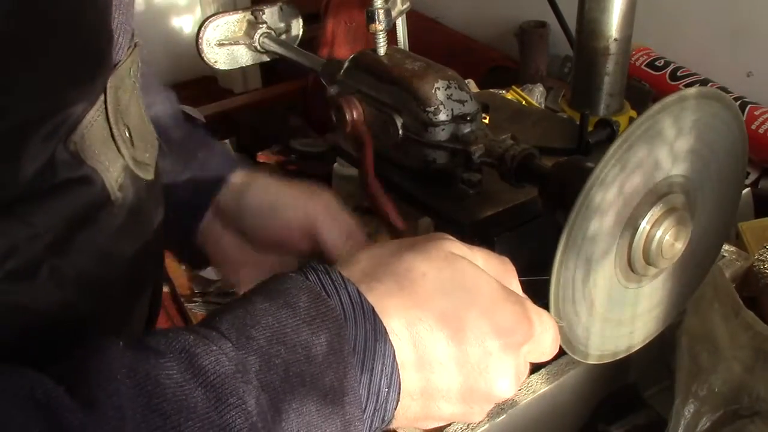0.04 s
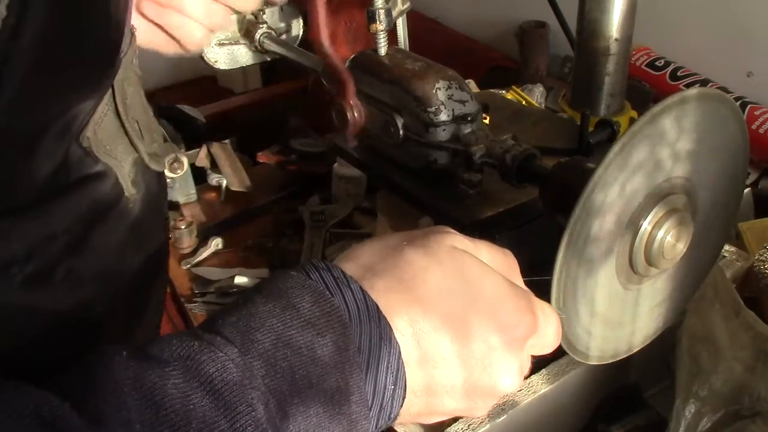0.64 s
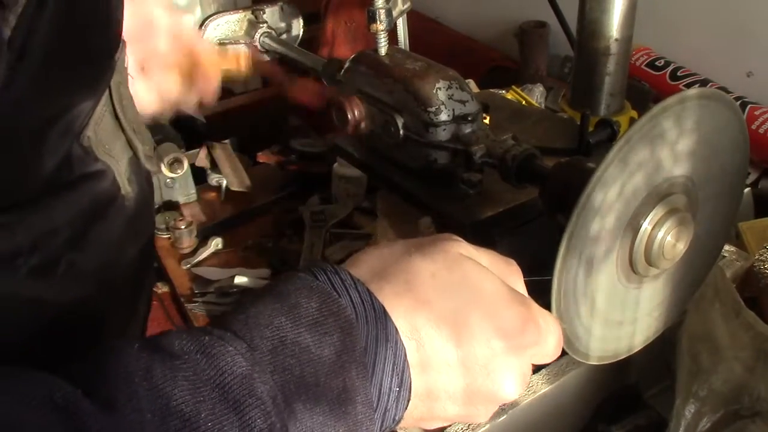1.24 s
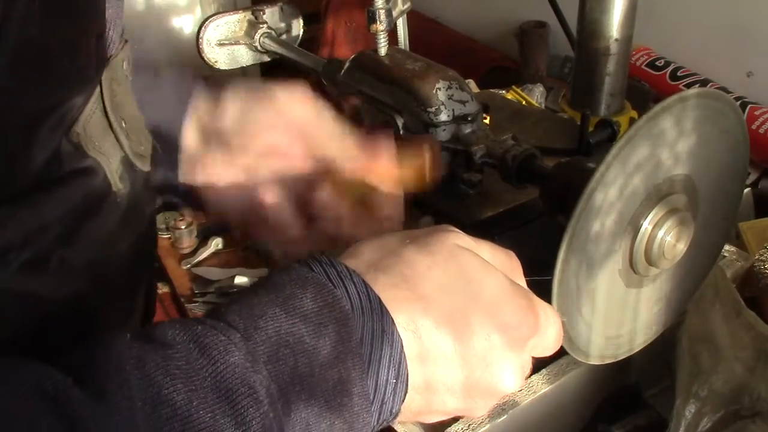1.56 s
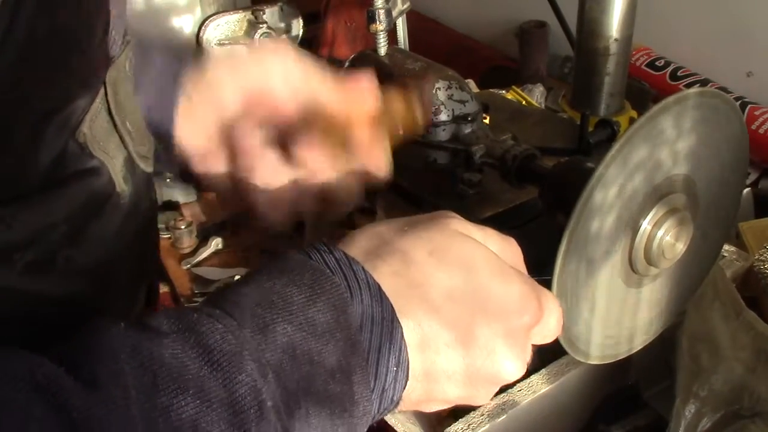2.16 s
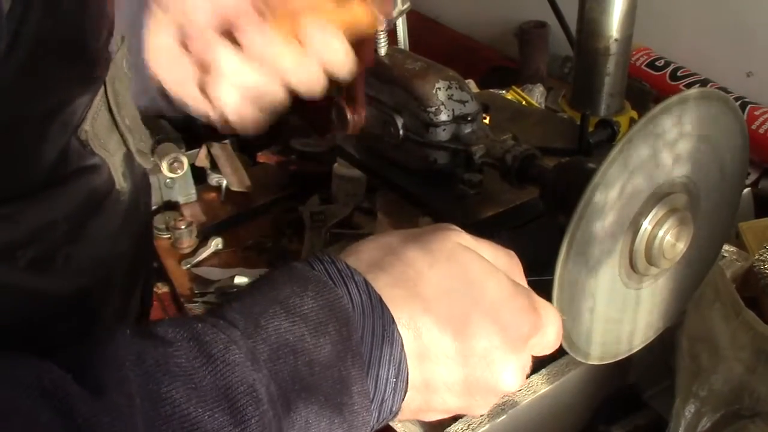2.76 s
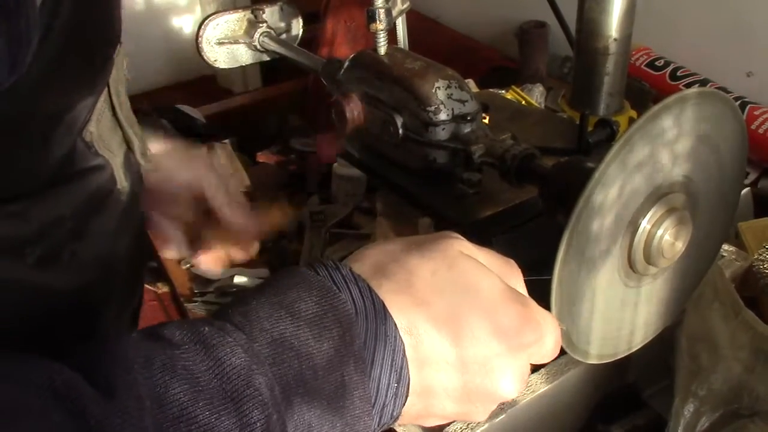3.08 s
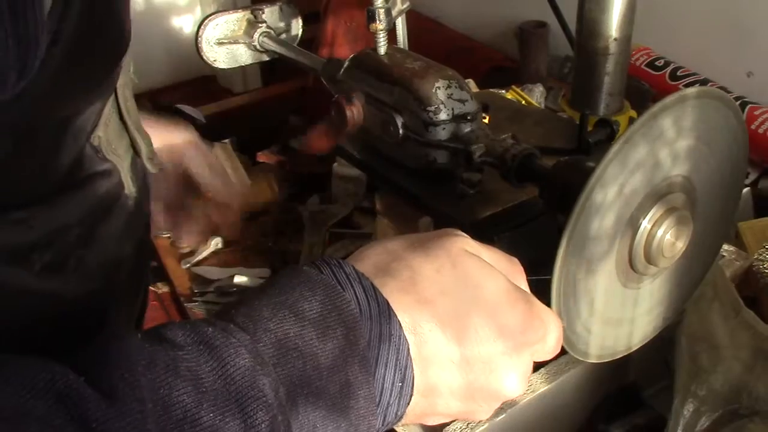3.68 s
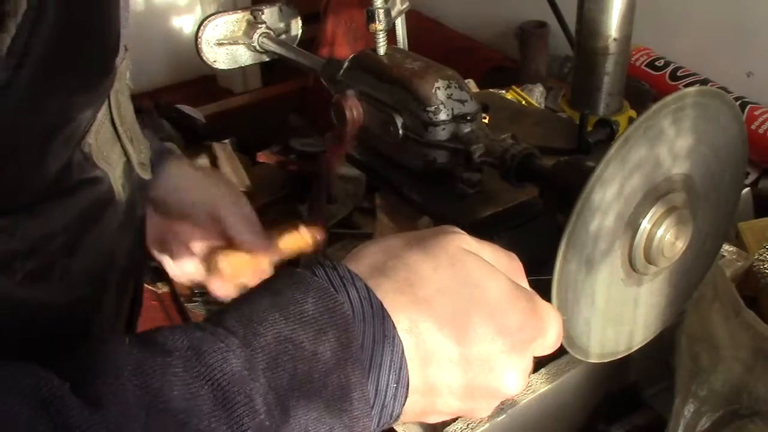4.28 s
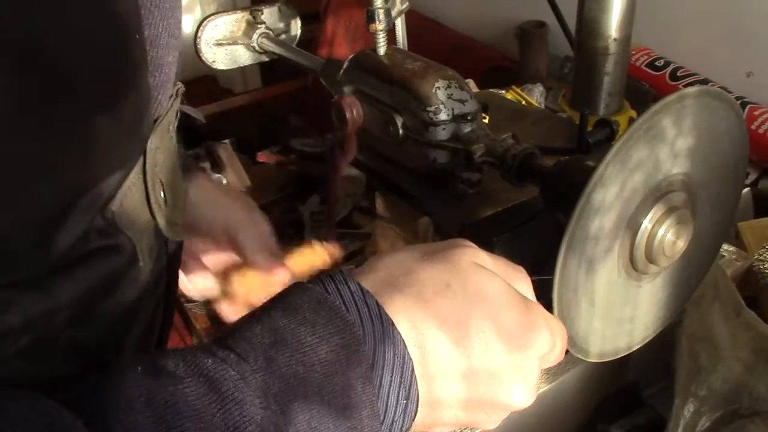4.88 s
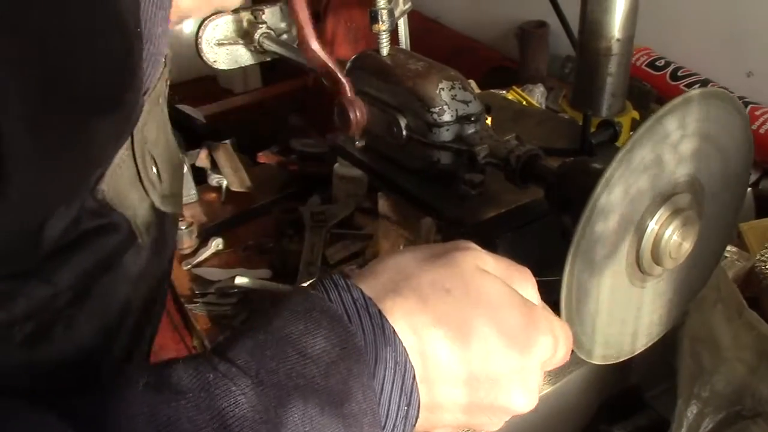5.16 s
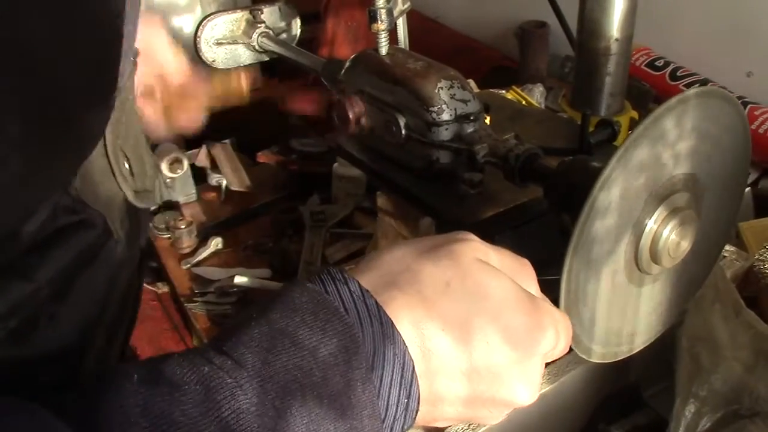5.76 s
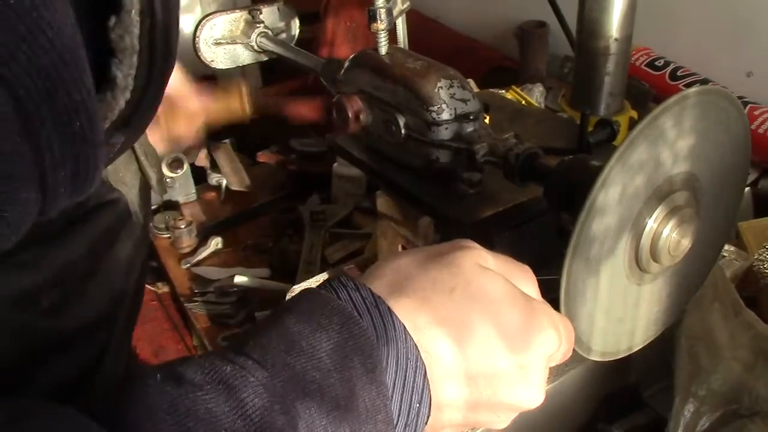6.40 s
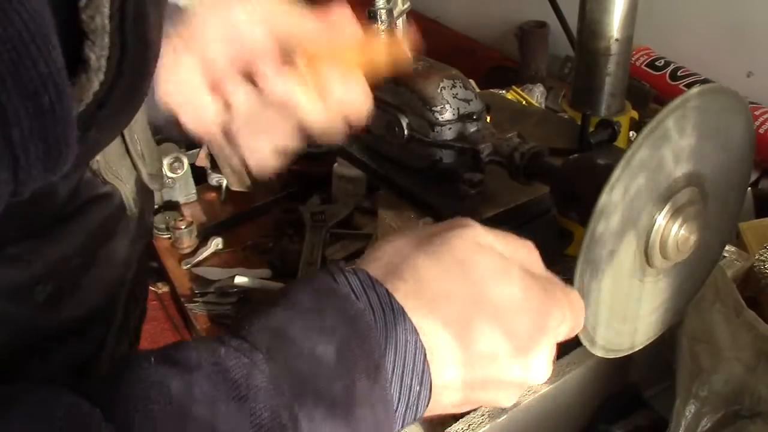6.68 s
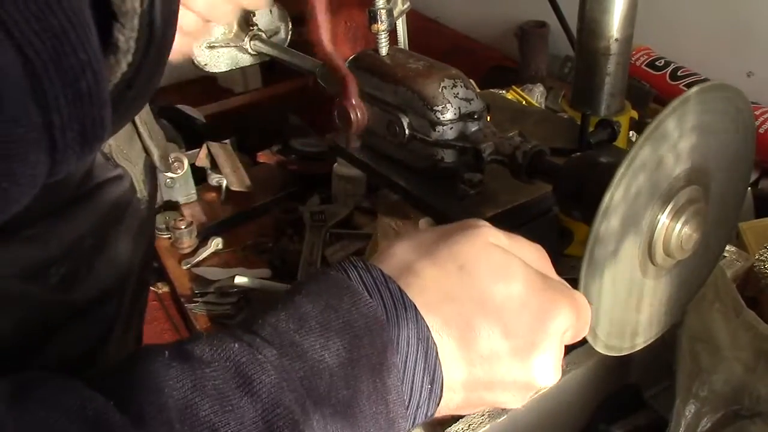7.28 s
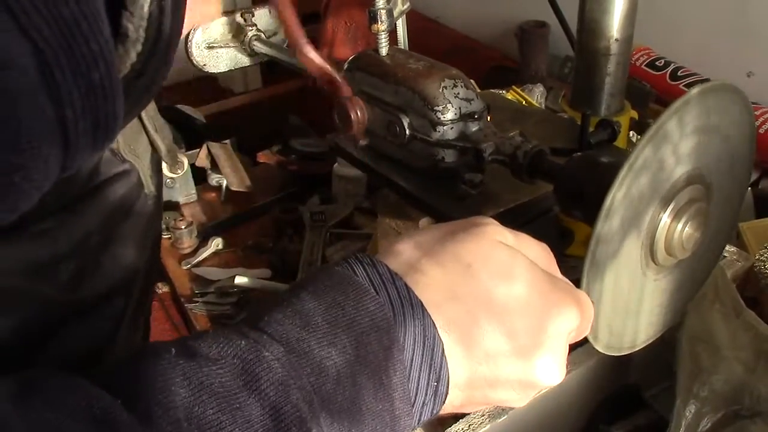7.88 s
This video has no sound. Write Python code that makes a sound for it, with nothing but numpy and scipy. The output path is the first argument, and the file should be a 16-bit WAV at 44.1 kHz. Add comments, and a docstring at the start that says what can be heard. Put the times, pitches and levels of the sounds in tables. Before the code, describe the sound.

Worn gears rattle and whir without pause as a hand-cranked grinder turns, close and centred before a stereo microphone at a workbench. Over them, a steel blade scrapes on the disc with a bright, ringing hiss that flutters with each turn and spits briefly when the edge catches. The pressure lightens midway and returns near the end, where the ring shifts in tone. The workshop adds very little echo.

```python
"""A steel blade on a hand-cranked grinding disc, at a workbench, close in front of a stereo microphone.
Grit scrapes the steel and makes it ring high, with a short burst whenever the edge catches. The disc
runs slightly out of true, so the grinding flutters with every turn. Under it, worn gear teeth rattle
the cast housing and the bench. Tools and walls nearby add a short tail."""
import sys
import numpy as np
from scipy import signal
from scipy.fft import rfft, irfft
from scipy.io import wavfile
from scipy.ndimage import uniform_filter1d, minimum_filter1d

SR = 44100
rng = np.random.default_rng(int(sys.argv[2]) if len(sys.argv) > 2 else 0)


def store_wav(level_fs):
    """Save 16-bit WAV to argv[1]."""
    pcm = np.round(np.clip(np.atleast_2d(level_fs), -1, 1) * 32767)
    wavfile.write(sys.argv[1], SR, pcm.T.astype(np.int16))


N = 350154
T = np.arange(N) / SR

# The handle passes the bottom of its circle. Each entry: time in seconds.
CRANK_TIMES = [-.68, .17, 1.0, 1.72, 2.35, 2.98, 3.61, 4.25, 4.9, 5.6, 6.26, 6.93, 7.6, 8.25]
# How hard the blade is pressed on, which also loads the gears. Each row: time in seconds, pressure in dB.
PRESSURE = [(0.0, 2.5), (0.73, 5), (1.23, 0), (1.92, 2.5), (3.44, -0.5), (3.48, 1.5), (3.99, -4.5),
            (4.47, 1.5), (4.6, -2.5), (4.98, -4), (5.49, -2.0), (5.61, -5.5), (5.82, -2.0), (6.0, -5),
            (6.12, -1), (6.3, -4.0), (6.69, 1), (7.32, -0.5), (7.38, 2), (7.94, 0.5)]
# The loaded gears clatter briefly. Each row: time of the peak in seconds, extra housing rattle in dB.
CLATTERS = [(.375, 1.5), (.74, 1.5), (3.08, 2.5), (3.51, 2.5), (4.55, 1), (5.13, 2.5), (5.34, 2), (5.84, 4),
            (6.93, 2.5), (7.57, 2)]
# How keenly the edge bites as the blade rocks. Each row: time in seconds, gain in dB.
EDGE_BITE = [(0.0, 2.0), (0.32, 5.0), (0.69, -1), (1.08, 6), (1.44, 0.5), (1.77, 4), (2.07, -5.5),
             (2.46, 3.5), (2.79, -1.5), (2.93, 4.5), (4.63, -2.5), (4.77, 1.5), (5.04, -1.5), (5.13, 2),
             (5.34, -7), (5.44, -0.5), (5.97, -2), (6.48, 2), (6.63, -7.5), (6.72, 2.5), (7.05, -6),
             (7.29, -5.5), (7.41, 0.5), (7.94, -7.5)]
# Where the blade touches sets the weight of its low ring. Each row: time in seconds, gain in dB.
TOUCH = [(0.0, 0.0), (2.75, -0.5), (3.15, 1.5), (3.27, -1.5), (3.57, 1), (3.98, -3.5), (5.01, 2.5),
         (5.75, -5.5), (6.16, -0.5), (7.94, 4)]
# The edge catches on coarse grit. Each row: start in seconds, relative level in dB.
CATCHES = [(.135, -15), (.167, -19), (1.258, -14), (2.391, -18), (2.601, -14), (2.745, -23), (2.858, -14),
           (3.539, -9), (3.623, -9.5), (5.116, -16), (5.232, -18), (6.705, -15)]

# Resonances. Each row: frequency in Hz, width in Hz, relative level in dB.
BENCH_MODES = [(191, 13, -11), (232, 9.4, -7), (277, 21.4, 0), (415, 16, -2.5), (478, 29, 4), (576, 28, 2),
               (683, 90, -1), (933, 48, -2), (1098.5, 46, 5.5), (1200, 21, 0), (1299, 24, 0),
               (1517, 21, 4.5), (1582, 29, 4.5)]  # bench and clamp
HOUSING_MODES = [(1756, 67, -11), (1883.4, 21.5, -0.5), (1937, 17.6, -1.5), (1995, 56, -9),
                 (2147.5, 39, 1.5), (2221, 38, -5), (2332, 37, -2), (2454, 65, -9.5), (2550, 79, -8.5),
                 (2638, 40, -3.5), (2675, 20, -7.5), (3257, 34, -9), (4572, 45, -7), (4690, 41, -6.5)]  # cast housing and gear wheels
SING_MODES = [(3456, 69, -1.5), (3528, 43, -2)]  # a singing band in the grinding
# Resonances of the steel, lowest first. Each row: frequency in Hz, width in Hz, relative level in dB,
# then frequency in Hz and relative level in dB after the fingers shift.
EDGE_MODES = [(7588, 190, 2.5, 7360, -7.5), (8100, 350, -6, 7870, -4), (9060, 260, -4, 8950, -9),
              (9470, 440, 1, 9550, 1.5), (10700, 220, -8, 10500, -2.5), (11030, 340, -5.5, 11150, -3),
              (11560, 230, -11.5, 11200, -5), (12450, 260, -16.5, 12500, -18),
              (12900, 200, -17, 12900, -12)]  # the edge's ring: the first two rows make its low ring, the rest its high ring
BENDING_MODES = [(473, 30, -4.5, 460, -22), (650, 60, -10, 662, -5), (884, 38, -13.5, 920, -2.5),
                 (4360, 120, -1, 4120, -19), (4677, 82, 0.5, 4700, 7.5), (6120, 200, -1, 5950, 4),
                 (6880, 150, -4, 6720, 2.5)]  # the whole blade flexing
# Smooth spectra, the beds that resonances stand on. Each row: frequency in Hz, relative level in dB.
BOOM_BED = [(20, -30), (60, -24), (105, -20), (160, -16), (205, -1.5), (290, 3), (380, -4), (470, -11),
            (1000, -37), (16000, -80)]  # low boom under the gears
BENCH_BED = [(20, -50), (60, -34), (110, -25.5), (165, -27), (220, -13.5), (320, -7), (760, -4.5),
             (1400, -11), (1750, -7.5), (2600, -24), (16000, -66)]  # dense small modes of the bench
HOUSING_BED = [(20, -70), (900, -41.5), (1600, -26), (1950, -14), (2550, -17.5), (2850, -23.5),
               (4400, -20.5), (5200, -36), (16000, -51)]
EDGE_BED = [(20, -80), (4000, -40), (7000, -41), (12000, -29.5), (16000, -36)]
SCRAPE_BED = [(20, -53), (1000, -16.5), (2900, -6), (4000, -3.5), (4800, -4.5), (5120, -8.5), (5500, -3),
              (6500, -1), (7100, -5.5), (8000, -4.5), (11200, -4), (13500, -15.5), (15600, -18)]  # the flat face on the disc
# Left and right differ slightly in level and phase across the treble.
# Each row: frequency in Hz, left minus right in dB, phase lead of the left in radians.
TREBLE_BALANCE = [(5300, -2, 0), (6060, -2.5, -0.46), (7200, 3, -0.14), (7940, -4.5, -.03),
                  (8600, 2, -0.05), (9540, -2.4, -0.1), (10200, 3.5, -0.078), (10950, -3, -0.35),
                  (11900, 0.5, 0.067)]

# How parts follow the pressure. Each law: base level in dB, dB per dB of pressure, fade in dB per second.
HUM_LAW, BOOM_LAW = (-58.8, 0.2, 0.6), (-41.5, 0.82, 2.65)
BENCH_LAW, HOUSING_LAW = (-31.5, 0.54, 0.062), (-22.5, 0.58, 0.037)
SCRAPE_LAW, SING_LAW = (-21.5, 1.07, 0.097), (-27.3, 0.35, 0.5)

TEETH_PER_CRANK, TEETH_PER_DISC = 89, 14  # teeth that meet in one turn of each
REGRIP_S = 6.63  # the fingers shift on the blade, which retunes it


def amp(db):
    """Decibels to gain."""
    return 10 ** (np.asarray(db) / 20)


def unit_rms(x):
    """Scales to rms 1."""
    return x / np.sqrt(np.mean(x ** 2) + 1e-20)


def curve(rows):
    """A table of times and values, joined by straight lines sample by sample."""
    return np.interp(T, *np.transpose(rows))


def drift(hz):
    """Slow random wander of rms 1, with changes up to about hz."""
    f = np.fft.rfftfreq(N, 1 / SR)
    return unit_rms(irfft(rfft(rng.standard_normal(N)) / (1 + (f / hz) ** 4), N))


def ring(drive, bed, modes=(), size=16384):
    """A driven body rings with its resonances over a smooth bed; rms 1."""
    f = np.fft.rfftfreq(size, 1 / SR)
    bed_hz, bed_db = np.transpose(bed)
    power = amp(np.interp(np.log(f + 1), np.log(bed_hz), bed_db)) ** 2
    for hz, width, db in modes:
        power += (amp(db) / (1 + ((f - hz) / (0.81 * width)) ** 2)) ** 2
    log_gain = np.log(np.r_[power, power[-2:0:-1]]) / 2
    spectrum = np.exp(np.conj(signal.hilbert(log_gain)))  # minimum phase: ringing follows each impact
    response = np.fft.ifft(spectrum).real[:size // 2]
    return unit_rms(signal.oaconvolve(drive, response)[:N])


def grit(spread_db, per_s=14000):
    """Tiny impacts at random moments, a few much larger than the rest."""
    size = amp(spread_db * np.minimum(rng.exponential(1, N), 4.5))
    return unit_rms(size * rng.standard_normal(N) * (rng.random(N) < per_s / SR))


def pressed(law):
    """Gain of a part that grows with the pressure on the blade and fades as the work goes on."""
    db, follow, fade_db_per_s = law
    return amp(db + follow * curve(PRESSURE) - fade_db_per_s * T)


def nearby_scatter(x, t60):
    """Tools and walls close by scatter the sound into a short tail."""
    t = np.arange(SR // 4) / SR
    taps = rng.standard_normal(len(t)) * (rng.random(len(t)) < 4000 / SR) * (t > 0.002)
    tail = taps * np.exp(-np.log(1000) * t / t60)
    return signal.oaconvolve(x, tail / np.linalg.norm(tail))[:N]


def crank(surge_share=0.085):
    """The arm speeds up once a turn. Gives the teeth passed so far and the surge, from -1 to 1."""
    turns = np.interp(T, CRANK_TIMES, np.arange(len(CRANK_TIMES)))
    surge = np.cos(2 * np.pi * (turns - 0.38))  # peaks 0.38 turns past the bottom
    speed = uniform_filter1d(np.gradient(turns), size=8000) * (1 + surge_share * surge)
    return TEETH_PER_CRANK * np.cumsum(speed), surge


def disc_flutter(turns, depth_db, rolloff):
    """Gain from the disc's high spots, which come round once a turn and change as the contact wanders."""
    bumps = 0
    for k in range(1, 14):
        strength = (1 + 0.91 * drift(1.7)) / k ** rolloff
        bumps += strength * np.cos(2 * np.pi * (k * turns + rng.random()) + drift(0.92))
    return amp(depth_db * 2 * np.tanh(unit_rms(bumps) / 2))


def mesh_hum(teeth, surge, swing_db=1.8):
    """The gears hum faintly at the tooth rate, swelling with the surge of the arm."""
    tone = np.sin(2 * np.pi * teeth + 0.6 * drift(12))
    hum = unit_rms(tone * (1 + 0.51 * drift(7)))
    return pressed(HUM_LAW) * amp(swing_db * surge) * hum


def gear_rattle(teeth):
    """Worn teeth knock and slide: the housing rings and the bench drones over a low boom."""
    clatter = amp(sum(db * np.exp(-((T - s) / 0.033) ** 2) for s, db in CLATTERS))
    knocks = 1.16 + np.exp(-(teeth % 1) / 0.2)  # a blow as each tooth meets, then sliding
    runout = disc_flutter(teeth / TEETH_PER_DISC, depth_db=1.54, rolloff=0.81)
    housing = ring(grit(spread_db=1.7) * knocks * runout, HOUSING_BED, HOUSING_MODES)
    bench = ring(grit(spread_db=1.15) * knocks * runout ** 0.36, BENCH_BED, BENCH_MODES)
    boom = ring(grit(spread_db=2.5) * knocks, BOOM_BED)
    return pressed(HOUSING_LAW) * clatter * housing + pressed(BENCH_LAW) * bench + pressed(BOOM_LAW) * boom


def chatter(per_s, decay_s, depth_db):
    """Gain of the blade skipping on the grains: each bite comes at once and eases off."""
    hits = 1.0 * (rng.random(N) < per_s / SR)
    bites = signal.lfilter([1], [1, -np.exp(-1 / (decay_s * SR))], hits)
    return amp(depth_db * 2 * np.tanh(unit_rms(bites - bites.mean()) / 2))


def blade(drive, bed, modes, shift_s=0.019):
    """The steel rings with one set of modes before the fingers shift and another after."""
    modes = np.array(modes)
    before = ring(drive, bed, modes[:, :3])
    after = ring(drive, bed, modes[:, [3, 1, 4]])
    crossfade = np.pi / 2 * np.clip((T - REGRIP_S) / shift_s + 0.5, 0, 1)
    return np.cos(crossfade) * before + np.sin(crossfade) * after


def edge_catches(decay_s):
    """The edge catches on coarse grit in short bursts of harder cutting."""
    force = sum(amp(db) * (T >= s) * np.exp(-abs(T - s) / decay_s) for s, db in CATCHES)
    return force * blade(grit(spread_db=3.5, per_s=13000), EDGE_BED, EDGE_MODES)


def grinding(turns):
    """Grit cuts the steel: the edge rings and the face scrapes, both fluttering, over a singing band."""
    flutter = disc_flutter(turns, depth_db=1.35, rolloff=0.55)
    bite = flutter * chatter(per_s=650, decay_s=0.0011, depth_db=3.0)
    low_ring = blade(grit(spread_db=2.0) * bite ** 0.93, EDGE_BED, EDGE_MODES[:2])
    high_ring = blade(grit(spread_db=2.0) * bite, EDGE_BED, EDGE_MODES[2:])
    scrape = blade(grit(spread_db=1.16, per_s=22000) * bite ** 0.59, SCRAPE_BED, BENDING_MODES)
    sing = ring(grit(spread_db=0.5, per_s=22000), [(20, -84), (3400, -30), (16000, -56)], SING_MODES)
    edge_db = curve(EDGE_BITE)
    low_db = -25.5 + 0.57 * edge_db + curve(TOUCH)  # follows the edge's bite only in part
    edge = amp(low_db) * low_ring + amp(-20.5 + edge_db) * high_ring
    return edge + pressed(SCRAPE_LAW) * scrape + pressed(SING_LAW) * sing


def scene():
    """Blade and gears are close and straight ahead; only the gears' faint scatter reaches the sides."""
    teeth, surge = crank()
    gears = gear_rattle(teeth) + mesh_hum(teeth, surge)
    steel = grinding(teeth / TEETH_PER_DISC) + edge_catches(decay_s=0.0096)
    middle = gears + amp(0.25) * steel + amp(-9.0) * nearby_scatter(steel, t60=0.07)
    side = amp(-29) * nearby_scatter(gears, t60=0.041)
    return np.array([middle + side, middle - side])


def limiter(x, knee, ceiling=0.97, window=45):
    """Turns the gain down for a millisecond or two around the highest peaks."""
    peak = abs(x).max(0) + 1e-9
    headroom = ceiling - knee
    allowed = np.minimum(peak, knee) + headroom * np.tanh(np.maximum(peak - knee, 0) / headroom)
    return x * uniform_filter1d(minimum_filter1d(allowed / peak, window), window)


def record(dry):
    """Left and right differ slightly across the treble; then a peak limiter and a 15.7 kHz low-pass."""
    f = np.fft.rfftfreq(N, 1 / SR)
    hz, balance_db, lead = np.transpose(TREBLE_BALANCE)
    half = np.array([[0.5], [-0.5]])  # shared between left and right
    balance_gain = amp(half * np.interp(f, hz, balance_db, left=-0.15))
    balance_phase = np.exp(1j * half * np.interp(f, hz, lead, left=0))
    heard = limiter(irfft(rfft(dry) * balance_gain * balance_phase, N), knee=0.65)
    low_pass = signal.firwin(511, 15700, window=("kaiser", 9), fs=SR)
    return signal.oaconvolve(heard, low_pass[None], "same")


dry = scene()
out = record(dry)
store_wav(out)
```